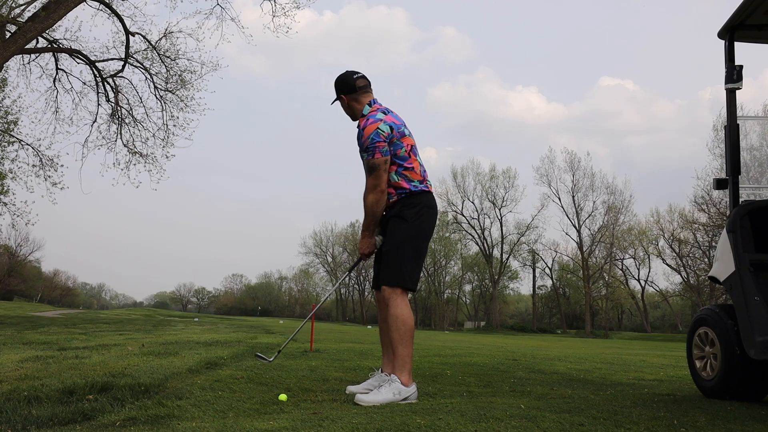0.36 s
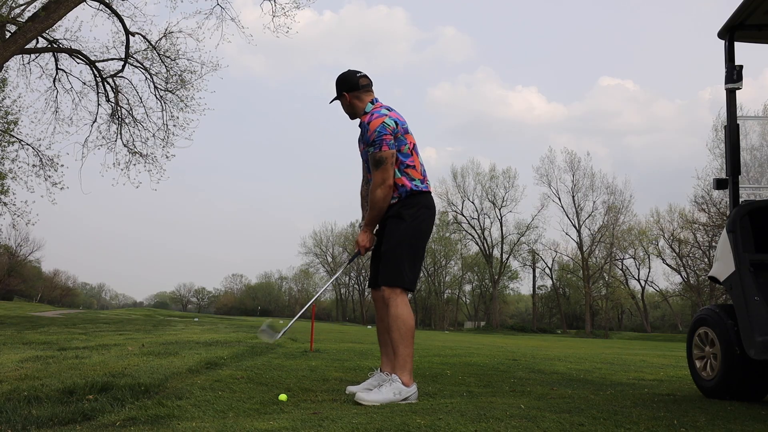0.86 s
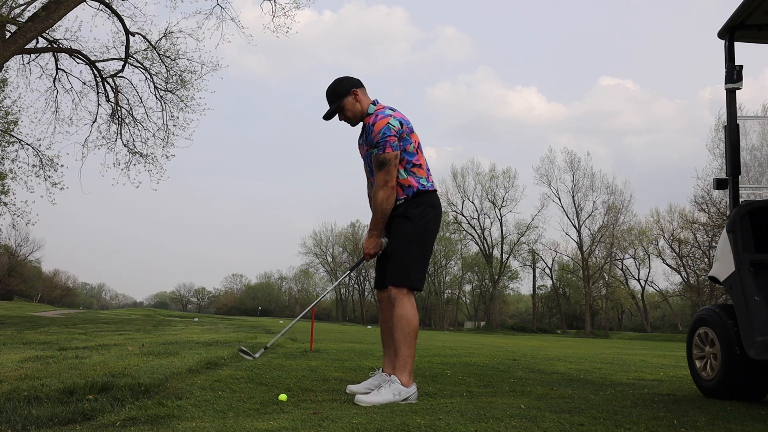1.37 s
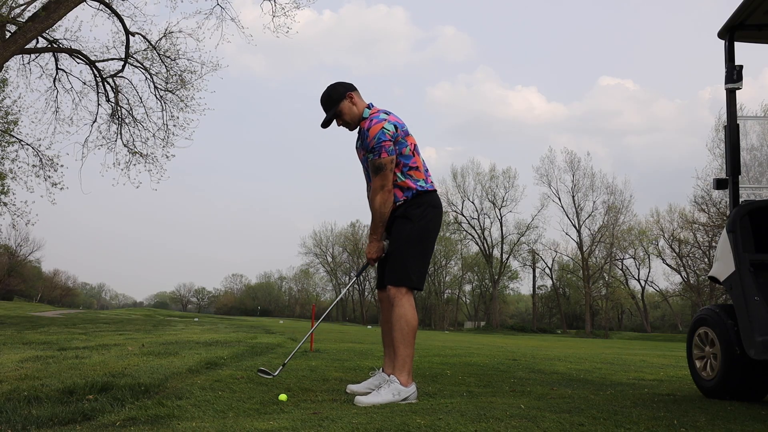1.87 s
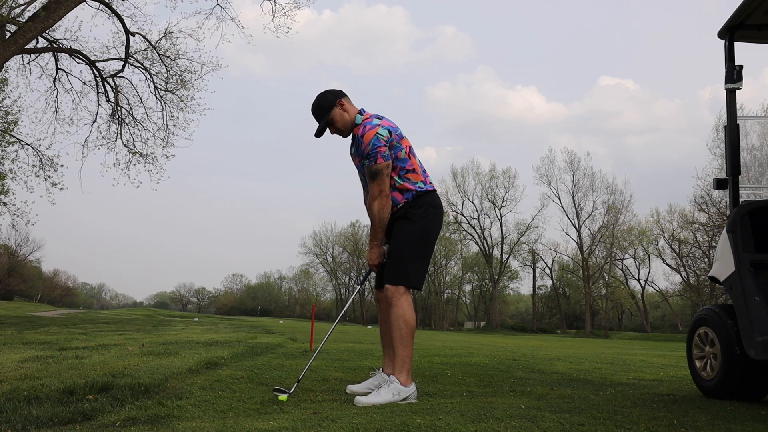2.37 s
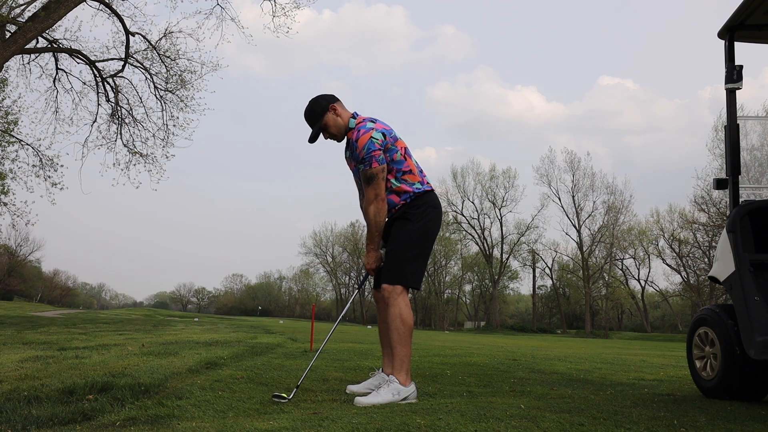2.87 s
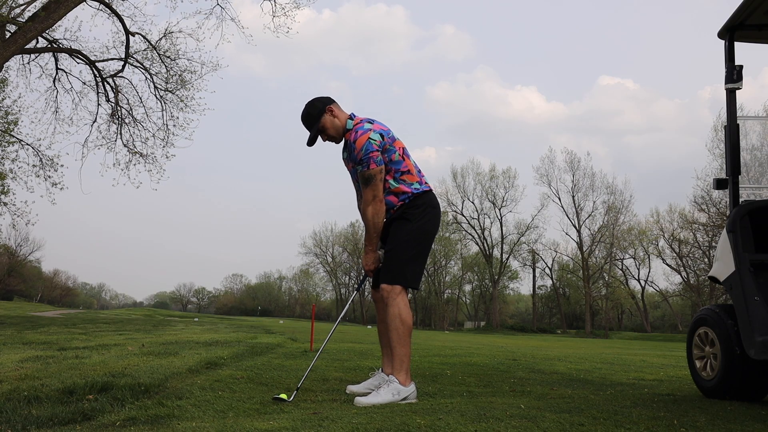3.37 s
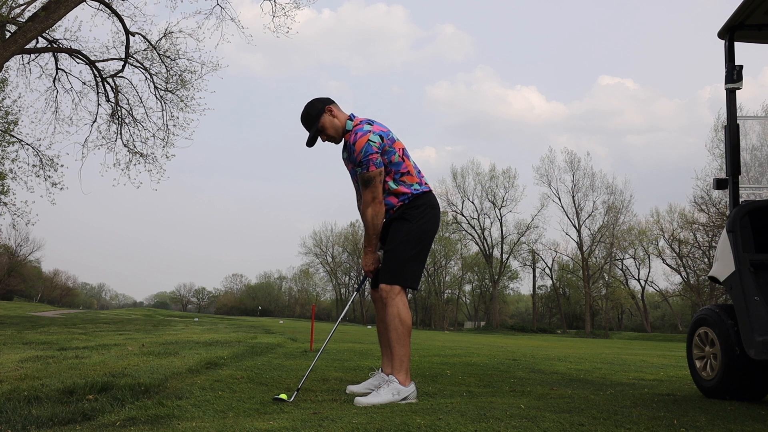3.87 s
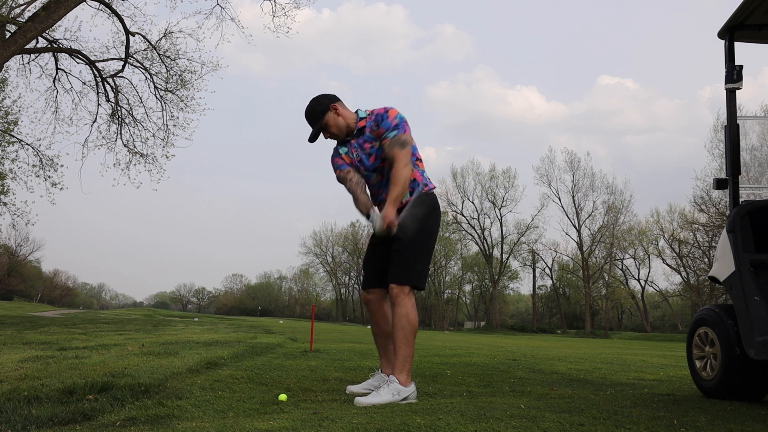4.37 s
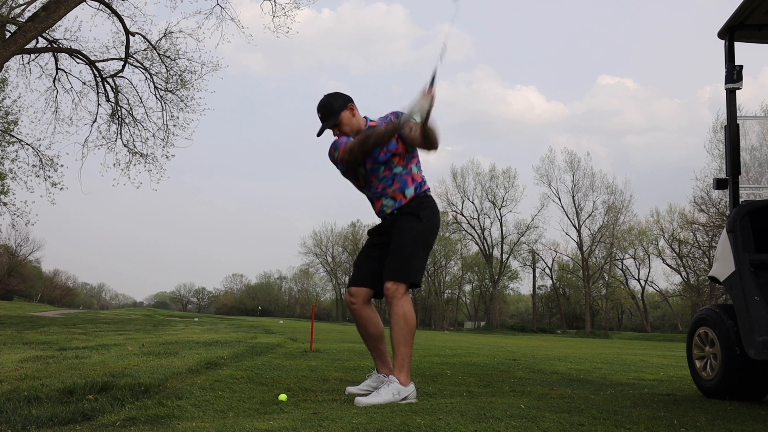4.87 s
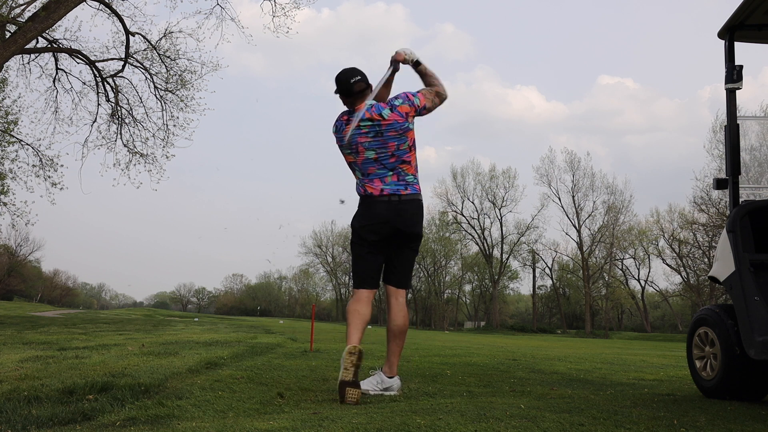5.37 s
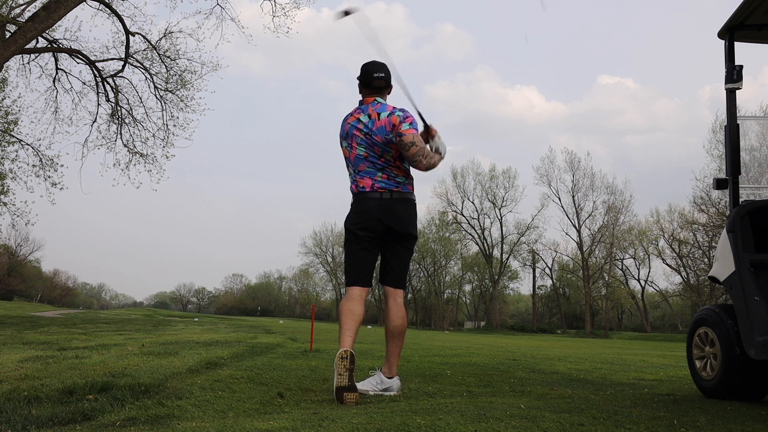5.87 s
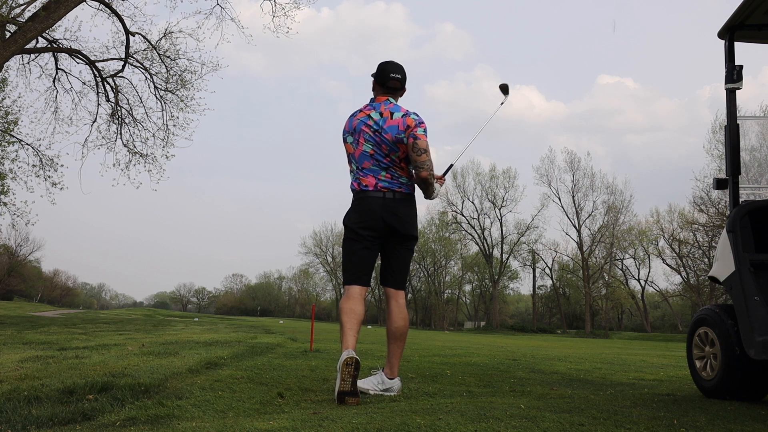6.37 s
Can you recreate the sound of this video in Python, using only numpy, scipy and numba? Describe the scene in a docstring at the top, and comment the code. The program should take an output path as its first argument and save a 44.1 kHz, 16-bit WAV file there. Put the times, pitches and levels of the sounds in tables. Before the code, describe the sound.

Open grass near trees, with a low distant road roar and a barely audible thin whine throughout. A songbird repeats falling whistles, then a quickening high trill overlaps a buzzy one. Faint calls and dry ticks follow. Cloth rustles softly, a club swishes down with a click, scuffs turf and cracks hard into a ball. The peak clips; trees return hiss and echoes. A fixed microphone's level ducks, then recovers.

```python
"""Distant road roar and a thin whine run throughout; a songbird opens with falling whistles (gliding sines).
Dry ticks, faint calls, a quickening high trill (arched notes) and a buzzy trill (modulated sines) follow.
Cloth rustles, then an iron swishes and clicks as it whips down (vortex tones, a noise transient), scuffs
the turf (noise bursts) and cracks into a ball (struck modes). The crack clips, the tree line returns it
as hiss and echoes, the level ducks and recovers, and further ticks and a late call follow."""
import sys
import numpy as np
from scipy import signal
from scipy.fft import rfft, irfft
from scipy.io import wavfile
from scipy.ndimage import uniform_filter1d
from numba import njit

SR = 44100
rng = np.random.default_rng(int(sys.argv[2]) if len(sys.argv) > 2 else 0)


def volts_from_decibels(level):
    """Turn decibel levels (scalar or array-like) into linear amplitude factors."""
    exponent = np.asarray(level, float) / 20
    return 10 ** exponent


def master(y):
    """Save y as 16-bit WAV."""
    cut = np.clip(np.atleast_2d(y).T, -1, 1)
    pcm = np.round(cut * 32767)  # scale
    wavfile.write(sys.argv[1], SR, pcm.astype(np.int16))


N = 285768
T = np.arange(N) / SR

# Every noise spectrum below gives relative power density: [f/Hz, level/dB]
# distant road
ROAD_SPECTRUM = [(15, -45), (25, -16.5), (86, 1.5), (210, -2), (458, -13.5), (524, -13), (668, -14.5),
                 (1060, -11), (1810, -18.5), (3650, -36.5), (9110, -42.5), (9880, -42), (15600, -44.5)]
ROAD_DB = -36.5
WHINE_HZ, WHINE_WOBBLE_HZ, WHINE_DB = 9960, 11.8, -74.5

# Note contours, levels relative to the note: [t/ms, f/Hz, level/dB]
# whistles: the steep fall proper, and the whole gentle fall
STEEP_CONTOUR = [(29, 4050, -13), (38, 3800, 3.5), (44.6, 3420, 2), (51, 2980, 2.5), (59.5, 2500, -5),
                 (70, 2150, -5), (82, 1900, -20)]
GENTLE_CONTOUR = [(0, 3850, -16), (4, 3650, 0), (17, 3200, -3.5), (32, 3000, 0), (39, 2700, -6),
                  (56, 2200, -10), (68, 1800, -24)]
# parts of one buzzy syllable: opening drop, buzzing body, high tip
DROP_CONTOUR = [(0, 3420, -12), (1.5, 3280, -4), (3.5, 2990, -2), (6, 2950, 0), (9.5, 3100, -12)]
BUZZ_CONTOUR = [(5.5, 2710, -18), (9, 2750, -4), (20, 2880, -6), (24.5, 2930, -24)]
TIP_CONTOUR = [(4, 4680, -32), (10, 4760, -26), (22, 4930, -25), (25.5, 5150, -18), (28, 5450, -7),
               (30, 5680, -6), (32.5, 5450, -22)]
BUZZ_HZ, BUZZ_DEPTH = 390, 1.1  # depth in rad
TIP_GROWTH, FULL_DB = 1.6, -33  # tip dB per syllable dB; level at which the two gains agree

# steep whistles: [t/s, level/dB, starting f/Hz]
STEEP_WHISTLES = [(-.012, -50, 4440), (.24, -49, 4450), (.495, -49, 4360), (0.749, -46.5, 4250)]
# gentle whistles: [t/s, level/dB]
GENTLE_WHISTLES = [(.99, -45.5), (1.223, -45), (1.459, -44), (1.692, -44), (1.924, -42.5), (2.163, -42),
                   (2.404, -42)]
# faint arched calls, the last a late one of overlapping strands (three rows):
# [t/s, peak level/dB, top f/Hz, length/ms, depth of arch/Hz]
CALLS = [(1.855, -54, 3520, 30, 201), (3.98, -62, 3660, 76, 80), (4.083, -55, 3350, 16, 150),
         (5.925, -54, 3100, 120, 430), (5.945, -60, 2760, 90, 250), (6.012, -55, 3270, 46, 400)]
# high trill, before its direct and scattered gains: [t/s at mid-note, level/dB]
ARCH_NOTES = [(2.125, -48.5), (2.235, -49), (2.328, -46), (2.428, -48), (2.51, -47.5), (2.592, -51),
              (2.664, -43), (2.75, -45), (2.826, -43.5), (2.9, -42), (2.984, -42.5), (3.061, -43.5),
              (3.13, -42.5), (3.199, -41.5), (3.265, -43), (3.327, -43.5), (3.395, -48.5)]
# course of the high trill, whose notes come to sink, shorten and bend deeper:
# [t/s, top f/Hz, length/ms, depth of arch/Hz]
ARCH_COURSE = [(2.12, 6800, 46, 597), (2.42, 7070, 60, 700), (2.67, 6870, 36, 760), (2.85, 6580, 29, 871),
               (3.4, 6310, 21.4, 904)]
# rasping lead-in of the buzzy trill, lower and upper voice: [t/ms from LEAD_S, f/Hz, level/dB]
LEAD_LOW = [(0, 3500, -60), (5, 3500, -53), (52, 3350, -51), (62, 3200, -60)]
LEAD_HIGH = [(0, 5150, -62), (6, 5150, -55), (48, 5150, -54), (56, 5150, -62)]
LEAD_S, LEAD_BUZZ_HZ = 2.195, 250
# pace and effort of the buzzy trill: [t/s, gap to next syllable/ms, level/dB]
TRILL_COURSE = [(2.25, 29.6, -41.5), (2.37, 30.3, -40), (2.47, 30.7, -38.5), (2.58, 31.5, -34),
                (2.66, 30.54, -32), (2.78, 28.5, -33.5)]
TRILL_START_S = 2.2517
# airy haze around the buzzy trill: [f/Hz, level/dB]
HAZE_SPECTRUM = [(2500, -26), (3700, -3), (4400, -15), (5300, -7), (6400, -5), (7500, -30)]
HAZE_RELATIVE_DB = -18.5  # re the syllables
# the wood's decay, and each singer's scattered (wet) and direct (dry) gain
WOOD_T60_S = 0.7
WHISTLE_WET_DB, TRILL_WET_DB, ARCH_WET_DB, ARCH_DRY_DB = -4.5, -13, -3.5, -2.5

# dry ticks, and one loud low click as the club whips down at 5.052 s:
# [t/s, level before filtering/dB, centre f/Hz, decay time constant/ms]
TICKS_AND_CLICK = [(1.45, -49, 6000, 5), (3.425, -37, 4000, 4), (5.052, -15.5, 2200, 3),
                   (5.295, -41, 4500, 1.5), (5.319, -39, 5500, 1.2), (5.33, -38, 3500, 1.5),
                   (5.34, -40, 3200, 1.5), (5.365, -42, 9000, 1.5), (5.55, -43, 4500, 7),
                   (5.824, -39, 4500, 5)]
# shirt and glove at takeaway, top of the swing and follow-through:
# [t/s, level/dB, rise/(dB/s), fall/(dB/s)]
CLOTH_RUSTLES = [(4.12, -64, 175, 180), (4.6, -64, 52, 80), (5.27, -61, 22, 33)]
# soft high cloth noise: [f/Hz, level/dB]
CLOTH_SPECTRUM = [(2000, -30), (5000, -8), (8500, 3), (12000, -13), (16000, -9)]

# shaft cutting the air: [t/s, vortex f/Hz, level/dB, octave level re tone/dB, head hiss level/dB]
SWISH_COURSE = [(4.93, 278, -66, -10, -72), (4.99, 346, -52, -10, -55), (5.02, 411, -36, -10, -41.5),
                (5.045, 476, -33, -9, -33), (5.056, 498, -19.5, -20, -31), (5.069, 517, -25, -21, -30.5),
                (5.074, 544, -31, -13, -35)]
# hiss of the moving head: [f/Hz, level/dB]
HEAD_HISS_SPECTRUM = [(250, -9), (450, 5), (1000, 0), (2300, -4), (3500, -11), (8500, -15), (11000, -23),
                      (15600, -27)]
GROUND_S = 5.078  # the sole touches down and the swish ends
# sole tearing through grass in jerks: [t/s, level/dB]
TURF_RIPS = [(5.0814, -12.5), (5.086, -24), (5.0866, -1.5), (5.0895, -15), (5.094, -17)]
RIP_RISE_DB_S, RIP_FALL_DB_S = 5500, 4500
# torn grass: [f/Hz, level/dB]
TURF_SPECTRUM = [(60, -28), (230, -14), (400, -17), (620, -1), (1200, -1), (3500, -6), (5400, -4),
                 (6300, -8), (8300, -0.5), (10500, -9), (15600, -13)]
SETTLE_S, SETTLE_DB, SETTLE_FALL_DB_S = 5.097, -30.5, 560  # grass and soil settling
# modes of head and ball: [f/Hz, level/dB, t60/s]
MODES = [(455, -11, 0.045), (644, -6.5, 0.03), (760, -7.5, 0.031), (1212, 4.5, 0.021), (2160, -15, 0.018),
         (4450, -14, 0.024), (5430, -12, 0.025), (7340, -21, .02), (8400, -14, 0.022)]
# blows on the head, sole on ground and then face on ball: [t/s, level/dB, contact/ms]
CONTACTS = [(5.0787, -11, 1.1), (5.0833, -4, 1.42), (5.0869, -1.5, 0.039)]
# late diffuse returns from trees: [t/s, level/dB, time to fall 20 dB/s]
TREE_RETURNS = [(5.153, -43, 0.086), (5.186, -41.5, 0.12), (5.235, -52, 0.068), (5.29, -65, .2),
                (5.385, -54, 0.086)]
# tree hiss: [f/Hz, level/dB]
TREE_SPECTRUM = [(900, -28), (1700, 1.5), (3000, -3.5), (4000, -9), (4600, -2.5), (5400, -10),
                 (7500, -10.5), (15600, -28)]
# single broad trunks that mirror the whole blow: [delay t/s, level/dB]
TRUNK_ECHOES = [(.071, -42), (.101, -33), (.115, -34), (.127, -36), (.155, -40)]
ECHO_TOP_HZ = 4000


def noise(spectrum):
    """Filtering: white noise weighted in frequency to a given power density, at rms 1."""
    hz, db = np.transpose(spectrum)
    log_f = np.log(np.arange(N // 2 + 1) * SR / N + 1)
    weight = volts_from_decibels(np.interp(log_f, np.log(hz), db))
    x = irfft(rfft(rng.standard_normal(N)) * weight, N)
    return x / x.std()


def walk(rate):
    """Random modulation: values drawn `rate` times a second, smoothed twice, with standard deviation 1."""
    k = int(SR / rate)
    steps = np.repeat(rng.standard_normal(N // k + 1), k)
    x = uniform_filter1d(uniform_filter1d(steps, k), k)[:N]
    return x / x.std()


def swell(s, db, rise_db_s, fall_db_s):
    """Exponential growth and decay: a gain that rises to s and falls after it at steady dB rates."""
    return volts_from_decibels(db - np.where(T < s, rise_db_s * (s - T), fall_db_s * (T - s)))


def at(rows, s):
    """Linear interpolation: the remaining columns of a (t/s, ..) curve at time s."""
    rows = np.transpose(rows)
    return [np.interp(s, rows[0], column) for column in rows[1:]]


def add(out, s, sound):
    """Superposition: add a sound to out from time s, trimmed to the scene."""
    i = int(s * SR)
    sound = sound[max(-i, 0):N - i]
    start = max(i, 0)
    out[start:start + len(sound)] += sound


def note(contour, buzz_hz=1., depth=0.):
    """Modulation: a gliding sine whose fast phase-and-level flutter, if any, splits it into sidebands."""
    ms, hz, db = np.transpose(contour)
    t = np.arange(int(ms[-1] * SR / 1000)) / SR
    flutter = 2 * np.pi * buzz_hz * t
    cycles = np.cumsum(np.interp(1000 * t, ms, hz)) / SR + rng.random()
    phase = 2 * np.pi * cycles + depth * np.sin(flutter)
    level = volts_from_decibels(np.interp(1000 * t, ms, db)) * (1000 * t >= ms[0])
    return level * (1 + min(depth, 1) * np.cos(flutter)) * np.sin(phase)


def road():
    """Broadband noise: far road roar whose bass and tyre hiss fluctuate independently."""
    roar = noise(ROAD_SPECTRUM)
    low = signal.sosfilt(signal.butter(2, 400, fs=SR, output="sos"), roar)
    roar = low * volts_from_decibels(0.17 * walk(4.44)) + (roar - low) * volts_from_decibels(0.86 * walk(1.44))
    return volts_from_decibels(ROAD_DB) * roar


def whine():
    """Narrow-band tone: a thin sine of constant amplitude whose frequency wobbles at random."""
    cycles = np.cumsum(WHINE_HZ + WHINE_WOBBLE_HZ * walk(60)) / SR
    return volts_from_decibels(WHINE_DB) * np.sqrt(2) * np.sin(2 * np.pi * cycles)


def birds():
    """Direct and scattered sound: trunks smear each singer into a decaying tail, by its depth in the wood."""
    whistle, calls, arches, trill = whistles(), faint_calls(), high_trill(), buzzy_trill()
    t = T[:SR // 2]
    wood = rng.standard_normal(len(t)) * 1000. ** (-t / WOOD_T60_S) * (t > .004)
    wood = wood / np.linalg.norm(wood)
    sent = volts_from_decibels(WHISTLE_WET_DB) * whistle + volts_from_decibels(TRILL_WET_DB) * (trill + calls) + volts_from_decibels(ARCH_WET_DB) * arches
    # moving air makes the direct sound flicker, most for the farthest singer
    direct = whistle * volts_from_decibels(2.1 * walk(300)) + trill + calls
    direct = direct + arches * volts_from_decibels(ARCH_DRY_DB + 2.6 * walk(350))
    return direct + signal.fftconvolve(sent, wood)[:N]


def whistles():
    """Frequency glide: sines that fall in pitch, the first ones steeply and the later ones gently."""
    out = np.zeros(N)
    for s, db, hz in STEEP_WHISTLES:
        # a faint, nearly level start, then the pitch breaks into the fall
        start = [(0, 1.02 * hz, -22), (6, hz, -9), (20, 0.965 * hz, -8)]
        add(out, s, volts_from_decibels(db) * note(start + STEEP_CONTOUR))
    for s, db in GENTLE_WHISTLES:
        add(out, s, volts_from_decibels(db) * note(GENTLE_CONTOUR))
    return out


def ticks_and_click():
    """Transients: ticks and the club's click are brief, exponentially decaying noise in a band."""
    out = np.zeros(N)
    t = T[:400]
    for s, db, hz, ms in TICKS_AND_CLICK:
        grit = rng.standard_normal(len(t)) * np.exp(-1000 * t / ms)
        band = signal.butter(2, [0.45 * hz, 1.35 * hz], "band", fs=SR, output="sos")
        add(out, s, volts_from_decibels(db) * signal.sosfilt(band, grit))
    return out


def arch(db, top_hz, ms, depth_hz):
    """Frequency arch: pitch climbs to a flat top and falls back further; the note is loudest on top."""
    u = np.linspace(-1, 1, num=21)
    hz = top_hz - depth_hz * (1 + 0.34 * u) * np.abs(u) ** 2.53
    return note(np.transpose([ms * (u + 1) / 2, hz, db - 15 * u ** 4]))


def faint_calls():
    """Superposed glides: faint arched calls, the last a late one of overlapping strands."""
    out = np.zeros(N)
    for s, *shape in CALLS:
        add(out, s, arch(*shape))
    return out


def high_trill():
    """Repeated glides: high arched notes, each centred on its own time, that quicken as they run on."""
    out = np.zeros(N)
    for s, db in ARCH_NOTES:
        top_hz, ms, depth_hz = at(ARCH_COURSE, s)
        add(out, s - ms / 2000, arch(db, top_hz, ms, depth_hz))
    return out


def buzzy_trill(count=18):
    """Sideband timbre: a rasping lead-in, then syllables whose pace and strength follow the effort."""
    trill = np.zeros(N)
    add(trill, LEAD_S, note(LEAD_LOW, LEAD_BUZZ_HZ, 2.4))
    add(trill, LEAD_S, note(LEAD_HIGH, LEAD_BUZZ_HZ, 1.1))
    trill = trill * volts_from_decibels(3 * walk(2500))  # the lead-in is hoarse
    s = TRILL_START_S
    for _ in range(count):
        gap_ms, db = at(TRILL_COURSE, s)
        add(trill, s - .0015, volts_from_decibels(db) * note(DROP_CONTOUR))
        add(trill, s - .0015, volts_from_decibels(db) * note(BUZZ_CONTOUR, BUZZ_HZ, BUZZ_DEPTH))
        # the high tip leads into the syllable and grows faster than it with effort
        add(trill, s - .033, volts_from_decibels(FULL_DB + TIP_GROWTH * (db - FULL_DB)) * note(TIP_CONTOUR))
        s += gap_ms / 1000
    haze_gain = volts_from_decibels(at(TRILL_COURSE, T)[1] + HAZE_RELATIVE_DB)
    trill = trill + (T > LEAD_S) * (T < s) * haze_gain * noise(HAZE_SPECTRUM)
    # the rasp is unsteady
    return trill * volts_from_decibels(1.7 * walk(3000))


def cloth():
    """Friction noise: the soft high rustle of cloth, swelling and dying with unsteady strength."""
    envelope = sum(swell(*row) for row in CLOTH_RUSTLES)
    return envelope * noise(CLOTH_SPECTRUM) * volts_from_decibels(1.5 * walk(40))


def swing():
    """Vortex shedding: the shaft's tone and octave rise and flicker as it speeds up; the head hisses."""
    hz, db, octave_db, hiss_db = at(SWISH_COURSE, T)
    phase = 2 * np.pi * np.cumsum(hz * (1 + 0.0483 * walk(150))) / SR
    tone = np.sin(phase) * volts_from_decibels(4.2 * walk(200))
    tone = tone + volts_from_decibels(octave_db + 2.3 * walk(150)) * np.sin(2 * phase)
    hiss = volts_from_decibels(hiss_db + 2.2 * walk(400)) * noise(HEAD_HISS_SPECTRUM)
    gate = (T > SWISH_COURSE[0][0]) * swell(GROUND_S, 0, 0, 2000)
    return gate * (volts_from_decibels(db) * tone + hiss)


def turf():
    """Tearing noise: grass rips in brief grainy bursts, then torn grass and soil settle more slowly."""
    tear = sum(swell(s, db, RIP_RISE_DB_S, RIP_FALL_DB_S) for s, db in TURF_RIPS)
    tear = tear + swell(SETTLE_S, SETTLE_DB, RIP_RISE_DB_S, SETTLE_FALL_DB_S)
    return tear * noise(TURF_SPECTRUM) * volts_from_decibels(3.5 * walk(900))


def impacts():
    """Modal excitation: each blow is a half-sine push, so a long, soft contact rings only the low modes."""
    out = np.zeros(N)
    t = T[:SR // 10]
    ring = sum(volts_from_decibels(db) * 1000. ** (-t / t60) * np.sin(2 * np.pi * hz * t) for hz, db, t60 in MODES)
    for s, db, ms in CONTACTS:
        push = np.sin(np.pi * np.clip(1000 * t[:200] / ms, 0, 1))
        add(out, s, volts_from_decibels(db) * np.convolve(ring, push / push.sum()))
    return out


def strike():
    """Radiation efficiency: head and ball are too small to radiate bass, so the blow is high-passed."""
    return signal.sosfilt(signal.butter(2, 110, "high", fs=SR, output="sos"), turf() + impacts())


def trees(blow):
    """Scattering and reflection: many trunks return grainy, fading hiss; broad ones mirror the blow."""
    fade = sum(volts_from_decibels(db) * (T > s) * 10. ** (-np.maximum(T - s, 0) / spread) for s, db, spread in TREE_RETURNS)
    fade = uniform_filter1d(fade, int(0.0077 * SR))  # soften the onsets
    out = fade * noise(TREE_SPECTRUM) * volts_from_decibels(3 * walk(400))
    dull = signal.sosfilt(signal.butter(1, [800, ECHO_TOP_HZ], "band", fs=SR, output="sos"), blow)
    for s, db in TRUNK_ECHOES:
        add(out, s, volts_from_decibels(db) * dull)
    return out


@njit
def duck(x, top, attack, release, ratio):
    """Compression: gain falls fast as the envelope passes a threshold and creeps back."""
    gain, envelope = np.empty(len(x)), 0.
    for i in range(len(x)):
        size = abs(x[i])
        envelope += (size - envelope) * (attack if size > envelope else release)
        gain[i] = (top / max(envelope, top)) ** (1 - 1 / ratio)
    return gain


def scene():
    """Superposition at a point: one microphone feeds both channels."""
    ambience = road() + whine() + birds()
    blow = strike()
    mono = ambience + ticks_and_click() + cloth() + swing() + blow + trees(blow)
    return np.tile(mono, (2, 1))


def top_cut(x):
    """Nothing passes above the cut-off."""
    return signal.sosfilt(signal.butter(12, 15760, fs=SR, output="sos"), x)


def record(dry):
    """Gain control and clipping: the level ducks after the crack, whose tip still clips."""
    # attack 18 ms, release 66 ms
    gain = duck(dry[0], volts_from_decibels(-29.0), 1 / (0.018 * SR), 1 / (0.066 * SR), 1.47)
    # faint treble noise that differs between the channels; the third difference also raises its level
    treble_noise = volts_from_decibels(-86.0) * np.diff(rng.standard_normal((2, N + 3)), n=3)
    mix = np.clip(dry * gain + treble_noise, -1, 1)
    return top_cut(mix)


dry = scene()
out = record(dry)
master(out)
```